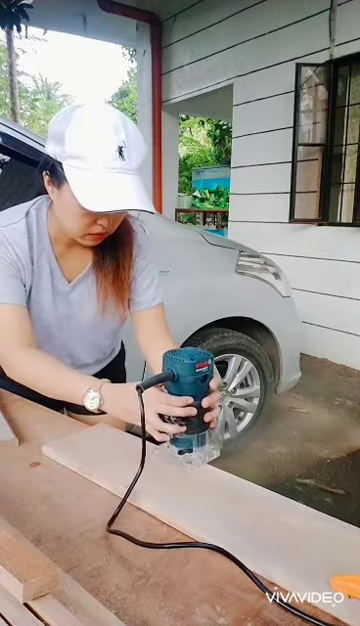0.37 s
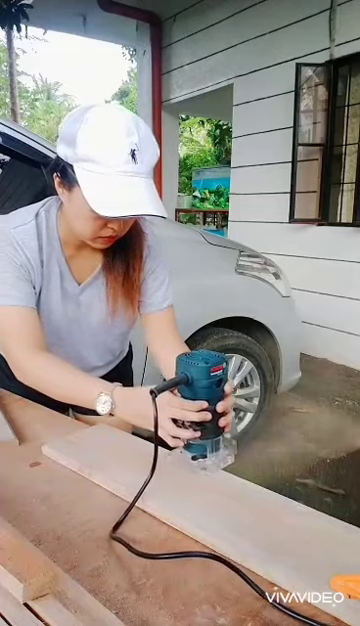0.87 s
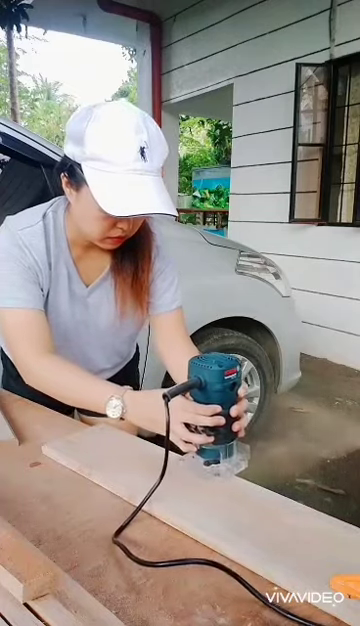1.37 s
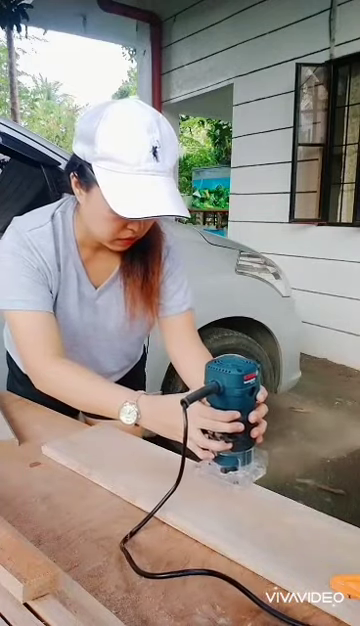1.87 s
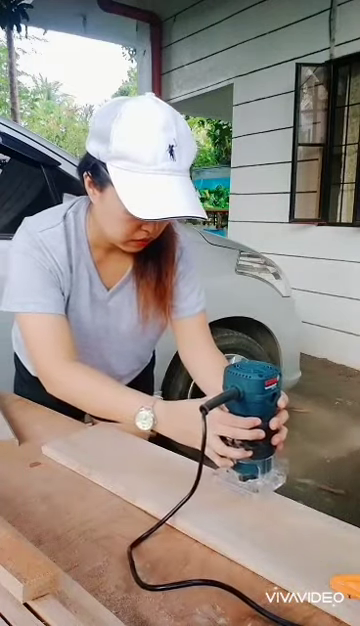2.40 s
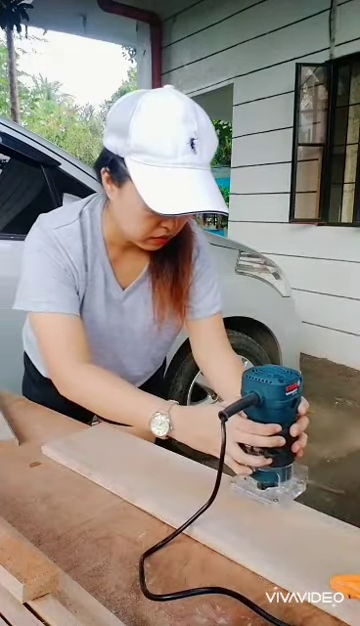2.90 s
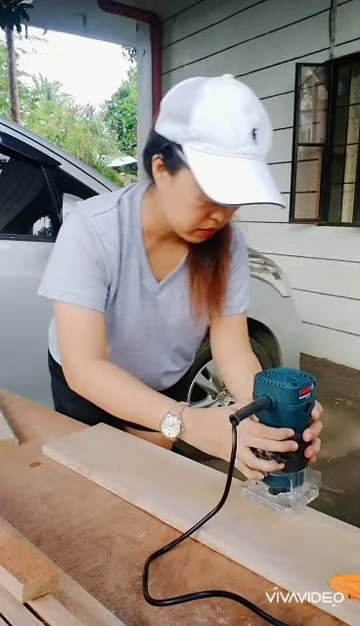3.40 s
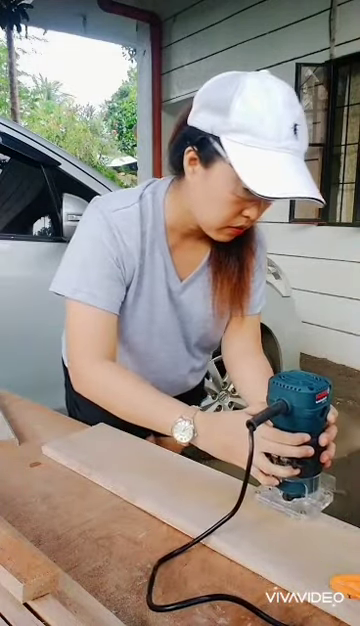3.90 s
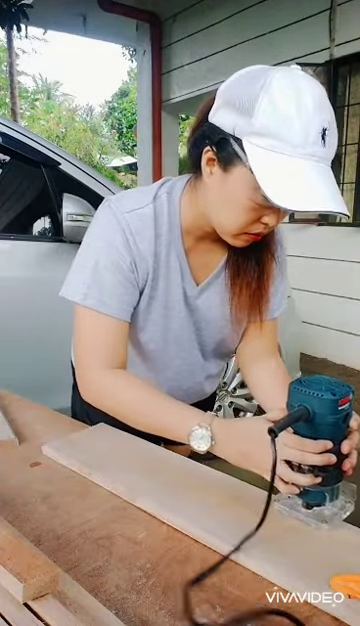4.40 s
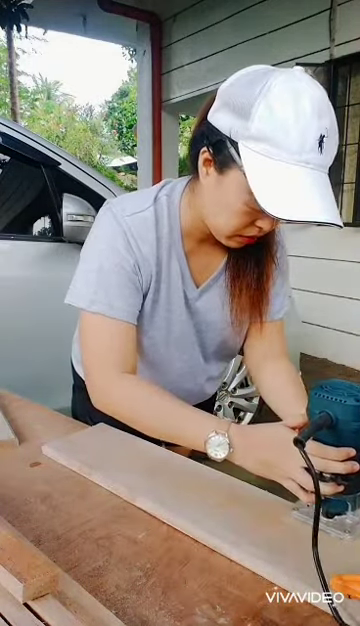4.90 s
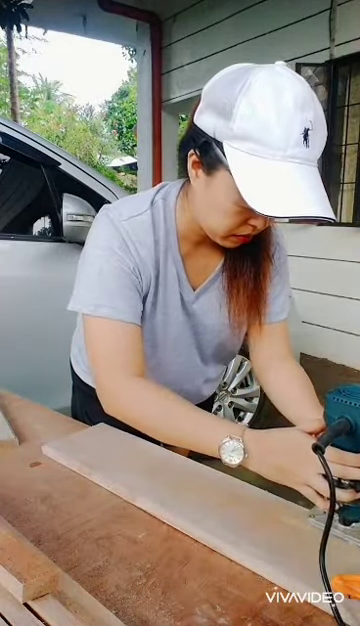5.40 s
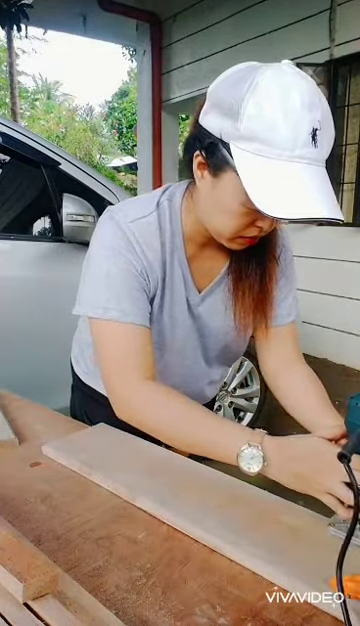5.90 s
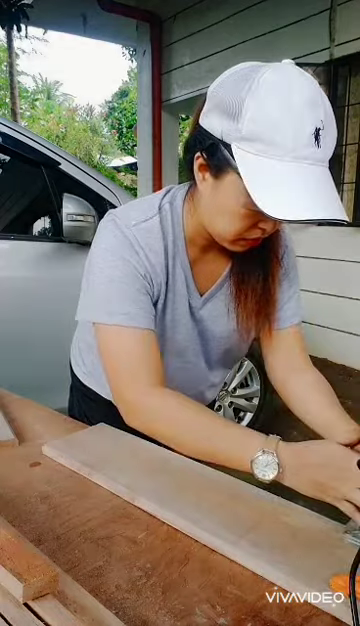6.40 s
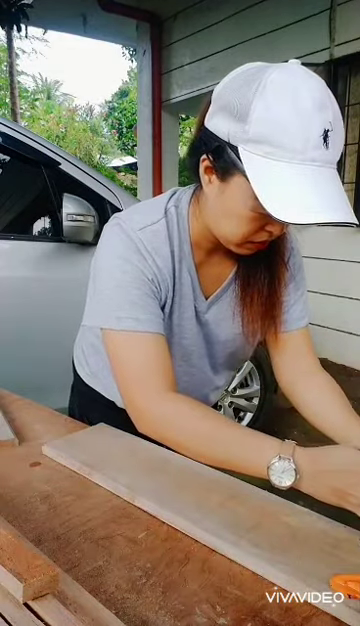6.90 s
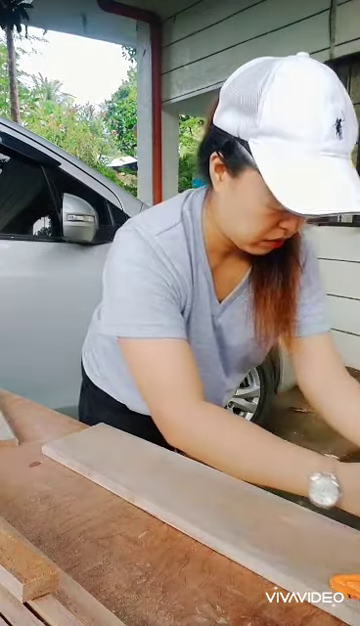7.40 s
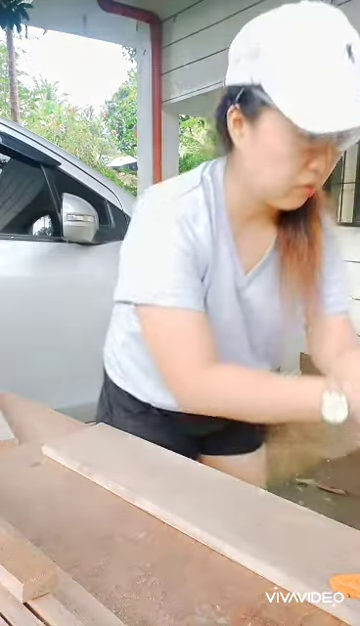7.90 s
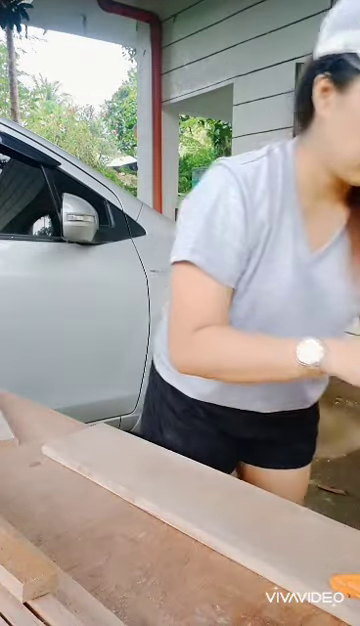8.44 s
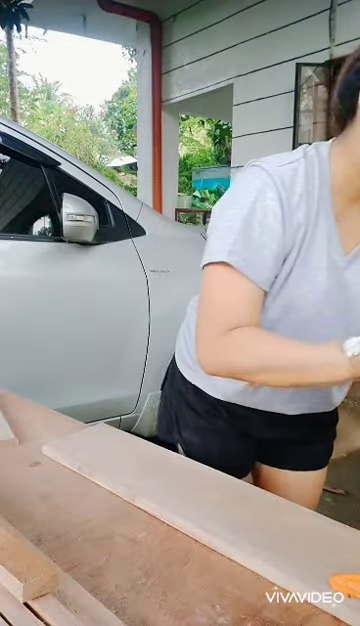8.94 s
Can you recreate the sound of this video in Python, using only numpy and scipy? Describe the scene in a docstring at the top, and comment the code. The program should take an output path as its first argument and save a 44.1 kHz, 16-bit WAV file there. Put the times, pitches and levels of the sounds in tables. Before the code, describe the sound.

A small handheld router whines loudly while trimming a board's edge, sagging and recovering, then catches, leaves the wood and spins up to a smoother, airy whine.

```python
"""Open carport: a small router trims a board's edge, then leaves the wood and runs up to free speed.
Sines on multiples of the shaft speed make the whines of shaft, cutter flutes, fan and commutator.
Shaped noise that brightens with speed makes the rushing air; one echo off a near hard surface ripples it.
A distant rising call, perhaps a rooster, overlaps the first half second as a stack of partials.
Behind it a faint mains hum, a sine, fades, and a breeze rumbles on the microphone as deep noise."""
import sys
import numpy as np
from scipy import signal
from scipy.fft import rfft, irfft
from scipy.io import wavfile

SR = 44100
rng = np.random.default_rng(int(sys.argv[2]) if len(sys.argv) > 2 else 0)


def ratio(d):
    """dB to gain"""
    e = np.asarray(d, float) / 20
    return 10 ** e


def materialize(psi):
    """Save the field psi as 16-bit PCM at rate SR to the path in sys.argv[1].

    A 1-D psi becomes a single channel; in a 2-D psi each row is a channel.
    """
    bounded = np.clip(np.atleast_2d(psi).T, -1, 1)
    quanta = np.round(bounded * 32767).astype(np.int16)
    wavfile.write(sys.argv[1], SR, quanta)


N = 399104
T = np.arange(N) / SR  # time in s


def in_time(rows):
    """Columns of a table, joined by straight lines at every sample."""
    s, *columns = np.transpose(rows)
    return [np.interp(T, s, column) for column in columns]


def at_hz(points, hz):
    """A spectrum read on a log-frequency axis."""
    point_hz, point_db = np.transpose(points)
    return np.interp(np.log(hz), np.log(point_hz), point_db)


def drift(rate_hz):
    """Slow chance of spread 1: noise twice through a one-pole low-pass."""
    r = np.exp(-80 * np.pi * rate_hz / SR)  # runs at every 40th sample
    noise = rng.standard_normal(N // 40 + 2002)
    slow = signal.lfilter([1], [1, -2 * r, r * r], noise)[2000:]  # skip the filter's start
    return np.interp(np.arange(N) / 40, np.arange(len(slow)), slow / slow.std())


def bumps(rows):
    """Sum of bell-shaped lifts in dB, each down to 1/e at its half length."""
    return sum(db * np.exp(-((T - s) / max(half_s, .01)) ** 2) for s, half_s, db in rows)


def settled(time_s):
    """Share 0-1 of the way to idle running since the bit left the board."""
    leave_s = 7.122
    return 1 - np.exp(-np.maximum(T - leave_s, 0) / time_s)


def partial(turns, multiple, level_db):
    """A sine of given rms level on one multiple of a turning phase."""
    return np.sqrt(2) * ratio(level_db) * np.sin(2 * np.pi * (multiple * turns + rng.random()))


def whine(speed, swell_db, wobble=.0004, flutter_db=1.3, wander_db=2.4, jitter_turns=.0042, flicker_db=3.2):
    """Multiples of the shaft speed; chips break unevenly, which blurs the weak high ones."""
    # the three main whines, before the swell: start_s, shaft_db, flutes_db, fan_db
    main_whines = [(0.0, -45.5, -29, -26.5), (0.5, -54, -21, -25.5), (0.9, -57, -25, -27.5),
                   (1.35, -56, -27, -26.5), (1.7, -53, -46, -27), (1.85, -54, -27.5, -32),
                   (1.95, -53, -26, -28.5), (2.25, -53, -35, -30), (2.5, -44, -28, -30),
                   (3.0, -41.5, -21, -25), (3.7, -40.5, -21, -25), (4.2, -39, -24, -29.5),
                   (4.35, -39, -25, -23), (4.55, -41, -27, -26.5), (5.65, -47, -27.5, -20),
                   (6.05, -47, -28, -24.5), (6.45, -47, -35, -20), (6.85, -47, -42, -23),
                   (7.0, -43, -32.5, -20), (7.25, -58, -35, -30), (7.4, -43, -29.5, -33),
                   (7.65, -61, -31, -32), (7.9, -53, -33, -46), (8.15, -43, -36, -39),
                   (8.45, -37.5, -29.5, -48), (8.85, -38, -32, -39), (9.05, -37, -37, -42)]
    # where those three sit: multiples of the shaft speed
    main_multiples = [1, 2, 16]
    # overtones of the flutes and the commutator (x24), before surge and swell: multiple, cutting_db, idle_db
    overtones = [(4, -30, -44), (5, -46, -54), (6, -36, -52), (8, -44, -48), (10, -46, -54), (24, -46, -36)]
    # single overtones surge or sink as the tool moves along the board:
    # multiple -> rows of centre_s, half_length_s, lift_db
    surges = {4: [(.2, .5, -7), (1.35, .2, -5), (1.68, .09, 7.5), (1.85, .05, -12), (2.6, .12, -6),
              (4.5, .3, 6), (5.95, .25, 3), (6.45, .1, 5), (6.95, .12, -7), (4.95, .25, 5), (3.3, .3, 2.5),
              (7.9, .12, 13), (8.55, .3, 15)], 5: [(.2, .4, -5), (1.5, .55, 15), (2.0, .25, 7),
              (6.75, .3, 11)], 6: [(.05, .3, -11), (.65, .2, 4), (1.5, .1, -8), (2.3, .15, 4),
              (3.4, .7, -7), (4.2, .1, -7), (4.75, .3, 3), (6.05, .1, 4), (6.33, .13, -10)],
              8: [(1.9, .25, -8), (2.7, .3, 7), (4.65, .17, 7), (5.9, .25, 5), (6.65, .08, 16),
              (6.88, .12, 17), (7.06, .06, 11), (8.2, .17, 13), (8.57, .14, 12), (8.86, .07, 12)],
              10: [(.1, .45, 8), (1.0, .4, 12), (3.7, .3, 4), (4.35, .25, -4), (5.75, .15, 7), (6.5, .3, 3),
              (7.09, .07, 10)], 7: [(1.95, .3, -5), (2.6, .25, 5), (5.85, .25, 7)], 12: [(2.1, .35, 10),
              (3.0, .15, 7), (6.2, .8, -4)], 3: [(3.0, .4, 2), (4.9, .6, -4)], 9: [(.2, .3, 8)],
              32: [(4.6, .3, 5)], 14: [(3.55, .3, 10), (6.1, .7, 7)], 18: [(.4, .4, 6), (2.0, .3, 4),
              (2.85, .2, 5), (4.6, .4, 9), (5.6, .3, 4)], 28: [(2.3, .3, 5), (3.8, .4, -7), (4.95, .3, 7),
              (6.3, .3, 6)], 24: [(.65, .8, 12), (1.85, .08, 7), (2.75, .25, 4), (3.75, .45, 7),
              (5.3, .15, 4), (7.0, .15, 6), (7.3, .15, -8), (7.7, .1, 5), (9.0, .2, -10)]}
    # weaker multiples while the bit cuts, before bite, surge and swell: multiple, level_db
    cut_orders = [(3, -36), (7, -45), (9, -50), (12, -50), (14, -51), (17, -51), (18, -44), (20, -50),
                  (22, -48), (26, -48), (28, -44), (30, -42), (31, -42), (32, -37.5)]
    # how hard the bit bites, as a lift of the cutting multiples: start_s, lift_db
    bite = [(0, -1.5), (2.7, 1), (4.3, 1), (4.6, -1.5), (6.6, -2), (7.17, 0.5), (7.25, -13), (7.5, -20),
            (9.05, -25)]
    # multiples on which the flutes catch, relative to the catch level: multiple, relative_db
    catch_orders = [(4, 2.5), (6, -0.5), (8, -10), (10, -12), (12, -14), (14, -7)]
    catch_s, catch_spread_s, catch_db = 7.142, .015, -22.5
    unload_s = .08  # time constant from the cutting to the idle whines

    turns = np.cumsum(speed * (1 + wobble * drift(8.5))) / SR
    (bite_db,) = in_time(bite)
    idle = settled(unload_s)
    out = 0
    for multiple, level_db in zip(main_multiples, in_time(main_whines)):
        out = out + partial(turns, multiple, level_db + swell_db + flutter_db * drift(20.0))
    for multiple, cut_db, idle_db in overtones:
        level_db = cut_db + (idle_db - cut_db) * idle + bumps(surges[int(multiple)])
        out = out + partial(turns, multiple, level_db + swell_db + flutter_db * drift(20.0))
    for multiple, level_db in cut_orders:
        uneven_db = wander_db * drift(1.4) + flicker_db * drift(38.0)
        uneven_db = uneven_db + bumps(surges.get(int(multiple), []))
        jittered = turns + jitter_turns * drift(70.0)  # a timing error smears high multiples most
        out = out + partial(jittered, multiple, level_db + bite_db + swell_db + uneven_db)
    # the flutes catch once as they leave the board
    catch = np.exp(-.5 * ((T - catch_s) / catch_spread_s) ** 2)
    for multiple, relative_db in catch_orders:
        out = out + catch * partial(turns, multiple, relative_db + catch_db)
    return out


def air_rush(speed, rush_db, patchy_db=1.3):
    """Fan noise through the housing, split in bands that each rise with speed and flicker a little."""
    # relative air spectrum at the reference speed, before housing and echo: pitch_hz, density_db
    air = [(30, -20), (110, -25.5), (520, -20.5), (800, -3), (1250, 0), (2300, -0.5), (2750, -6.5),
           (4000, -8.5), (6200, -13), (7300, -9.5), (8700, -3), (9700, -15.5), (12500, -7.5), (15500, -8)]
    # housing and air passage resonances: centre_hz, width_hz, lift_db
    housing = [(613.4, 48, 9.5), (910, 110, 1.5), (1473, 88, 4), (1745, 150, -3), (2273, 340, 4.5),
               (3357, 220, 8), (6120, 1000, -5.5), (7960, 1120, 8.5)]
    # a faster fan is louder, most of all in the treble: pitch_hz, gain_db_per_octave_of_speed
    speed_gain = [(300, 10.5), (650, 3), (1500, 13.5), (4000, 22.5), (8000, 21.5), (12500, 41)]
    reference_speed_hz = 575
    echo_s, echo_db = .00597, -15  # a nearby hard surface
    lift_off_hz, lift_off_width_hz = 3360, 420

    hz = np.maximum(np.fft.rfftfreq(N, 1 / SR), 1)
    colour = ratio(at_hz(air, hz))
    for centre_hz, width_hz, lift_db in housing:
        colour = colour * ratio(lift_db / (1 + (2 * (hz - centre_hz) / width_hz) ** 2))
    colour = colour * abs(1 + ratio(echo_db) * np.exp(-2j * np.pi * hz * echo_s))  # ripples the spectrum
    noise = rfft(rng.standard_normal(N)) * colour / np.sqrt(np.mean(colour ** 2))

    centres = np.geomspace(60, 15000, num=12)
    out = 0
    for centre, share in zip(centres, np.eye(len(centres))):
        band = irfft(noise * np.interp(np.log(hz), np.log(centres), share), N)  # overlapping triangles
        speed_db = at_hz(speed_gain, centre) * np.log2(speed / reference_speed_hz)
        out = out + band * ratio(rush_db + speed_db + patchy_db * drift(13.4))
    # the rush around 3.4 kHz swells after lift-off
    narrow = irfft(noise / (1 + (2 * (hz - lift_off_hz) / lift_off_width_hz) ** 2), N)
    lift_off_db = bumps([(7.8, .35, 4.5)])  # centre_s, half_length_s, lift_db
    return out + narrow * ratio(rush_db) * (ratio(lift_off_db) - 1)


def distant_call(rough=.002, flutter_db=1.5):
    """A slightly hoarse rising call; its second partial takes over near the end."""
    # course of the call, its level shared by all partials: start_s, pitch_hz, level_db
    call = [(0.01, 481.4, -53), (.05, 483.2, -17), (.08, 484, -26), (.14, 486.7, -22), (.26, 496, -23),
            (.33, 497.2, -25.5), (.38, 507.6, -19.5), (.42, 511.4, -35), (.5, 500, -33), (.58, 512, -49),
            (.65, 510, -68)]
    # balance of the partials: multiple, relative_db
    call_partials = [(1, -26), (2, -2.5), (3, -0.5), (4, -18)]
    # the second partial opens up: start_s, lift_db
    call_opening = [(.38, -1.5), (.45, 12)]
    pitch_hz, level_db = in_time(call)
    (opening_db,) = in_time(call_opening)
    turns = np.cumsum(pitch_hz * (1 + rough * drift(37.0))) / SR
    out = 0
    for multiple, relative_db in call_partials:
        partial_db = level_db + relative_db + opening_db * (multiple == 2)
        out = out + partial(turns, multiple, partial_db + flutter_db * drift(24.0))
    return out


def hum():
    """A sine near twice a mains frequency, fading and wavering slowly."""
    hum_hz, start_db, fade_db_per_s = 118, -58, 5
    return partial(T * hum_hz, 1, start_db - fade_db_per_s * T + 2.4 * drift(3.0))


def breeze(top_hz=70, lumpy_db=4.0):
    """Moving air on the microphone: lumpy noise in the deep bass, slowly rising."""
    start_db, rise_db_per_s = -60, .5
    low = signal.lfilter(*signal.butter(2, top_hz, fs=SR), rng.standard_normal(N))
    return low / low.std() * ratio(start_db + rise_db_per_s * T + lumpy_db * drift(4.4))


def scene():
    """All sources at one microphone, with the tool's speed and loudness over time."""
    # shaft speed while the load drags it down: start_s, speed_hz (turns per s)
    loaded_speed = [(0.0, 494.0), (0.15, 494.5), (0.3, 493.0), (0.6, 484.4), (0.9, 478.0), (1.1, 478.2),
                    (1.65, 472.1), (1.95, 466.6), (2.1, 466.8), (2.55, 474.1), (3.0, 484.3), (3.3, 492.7),
                    (3.45, 495.3), (4.05, 496.7), (4.5, 484.3), (4.7, 484.3), (5.05, 487.5), (5.55, 487.3),
                    (6.0, 485.6), (6.15, 486.4), (6.3, 489.1), (6.75, 490.2), (7.12, 495.4)]
    # air rush as feed and distance change, before dips and speed gain: start_s, level_db
    rush = [(0.0, -17.5), (1.2, -18), (1.97, -16.5), (2.75, -16.3), (3.0, -18), (4.1, -19), (5.3, -17.3),
            (6.3, -18), (6.92, -20), (7.18, -17.6), (7.28, -15.7), (8.24, -18), (9.05, -17.8)]
    # the whole tool dips briefly, given for the air rush: centre_s, half_length_s, lift_db
    dips = [(.39, .06, -3.5), (.85, .1, -1.2), (1.25, .08, -1), (1.75, .15, -1.2), (2.09, .05, -3.5),
            (2.46, .04, -2.2), (2.6, .05, -2.2), (2.9, .08, -2.2), (3.13, .05, -1), (3.46, .05, -2.3),
            (4.39, .04, -1), (4.59, .06, -1.5), (5.16, .07, -3), (5.48, .06, -1.6), (5.79, .1, -1),
            (7.2, .02, -1)]
    top_speed_hz, run_up_s = 586.3, .6  # free of the board, the shaft closes in on its top speed
    fade_out_s, fade_db_per_s = 9.039, 4000

    (loaded,), (rush_db,) = in_time(loaded_speed), in_time(rush)
    speed = loaded + (top_speed_hz - loaded) * settled(run_up_s)
    rush_db = rush_db + bumps(dips) + .3 * drift(6.0)
    swell_db = 1.23 * (rush_db - np.median(rush_db))  # the whines share the swell, a little stronger
    tool = whine(speed, swell_db) + air_rush(speed, rush_db)
    fade = ratio(-fade_db_per_s * np.maximum(T - fade_out_s, 0))
    return (fade * (tool + distant_call() + hum() + breeze()))[None]


def roll_off(x):
    """The treble ends steeply here."""
    return signal.sosfilt(signal.butter(12, 16870, fs=SR, output="sos"), x)


def record(dry):
    """Peaks are slightly rounded, then the top is cut steeply."""
    cutoff_hz = 15460
    rounded = .8 * np.tanh(dry / 0.78)
    steep = signal.ellip(12, .3, 80, cutoff_hz, fs=SR, output="sos")  # .3 dB ripple, 80 dB down
    mix = signal.sosfilt(steep, rounded)
    return roll_off(mix)


dry = scene()
out = record(dry)
materialize(out)
```